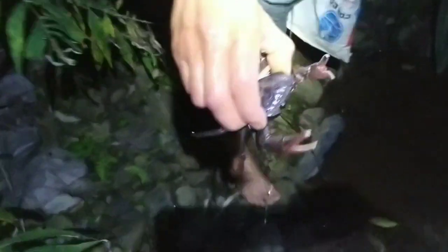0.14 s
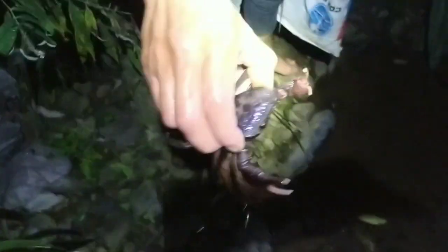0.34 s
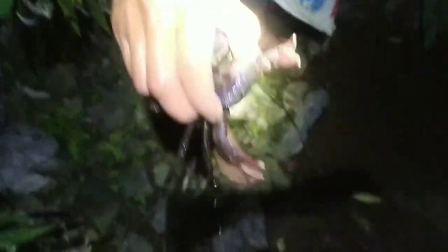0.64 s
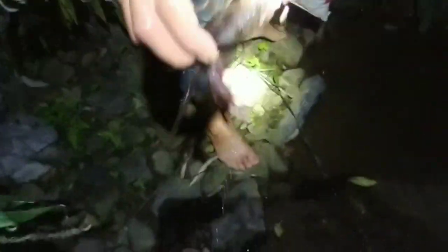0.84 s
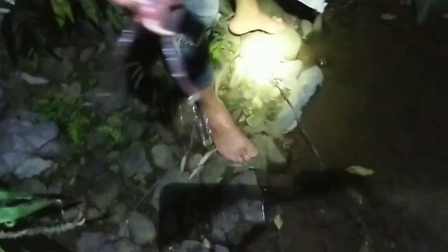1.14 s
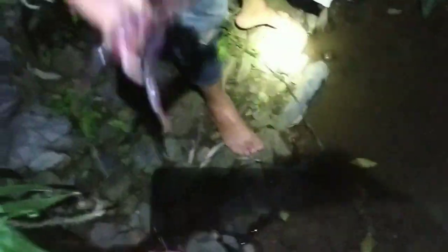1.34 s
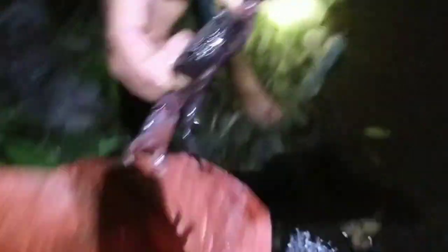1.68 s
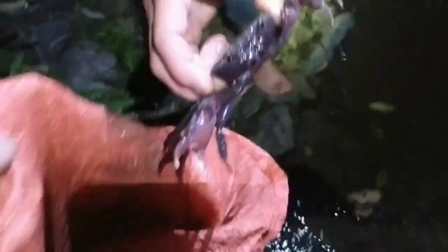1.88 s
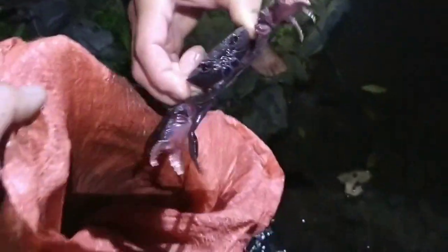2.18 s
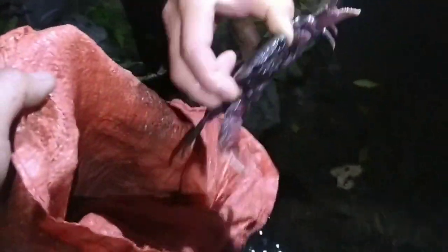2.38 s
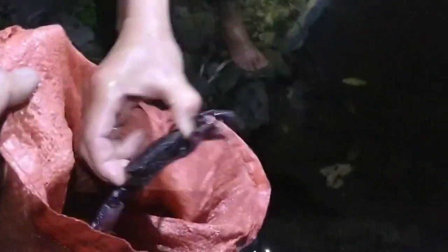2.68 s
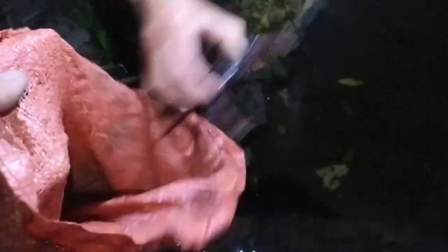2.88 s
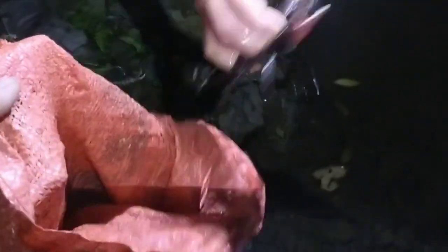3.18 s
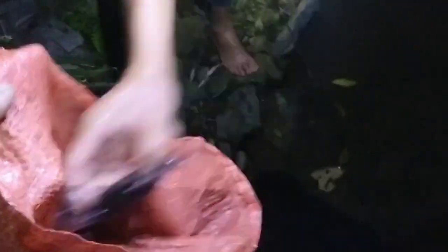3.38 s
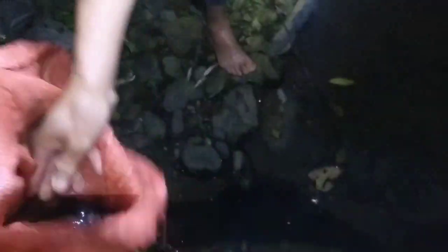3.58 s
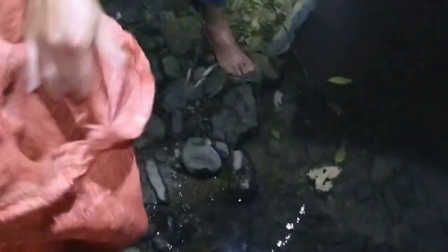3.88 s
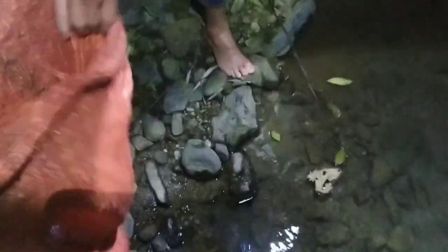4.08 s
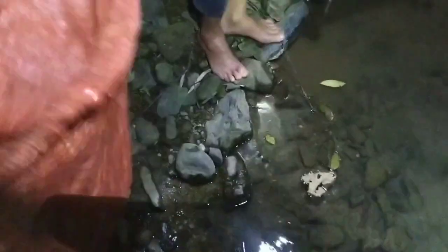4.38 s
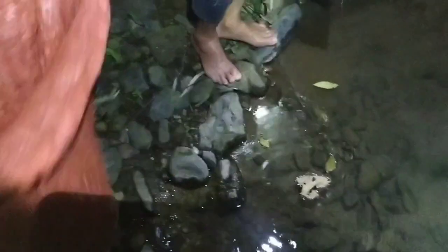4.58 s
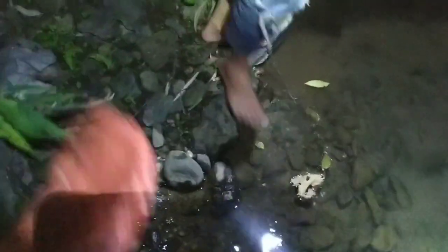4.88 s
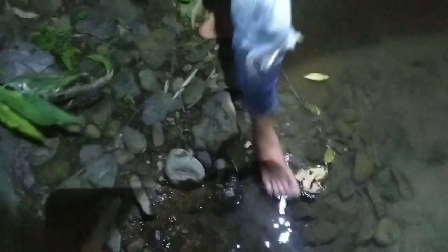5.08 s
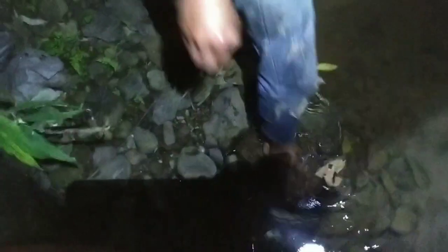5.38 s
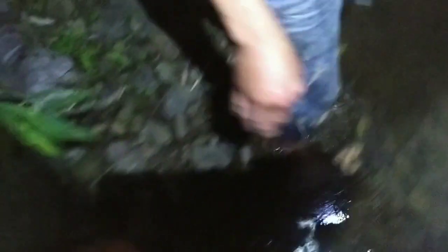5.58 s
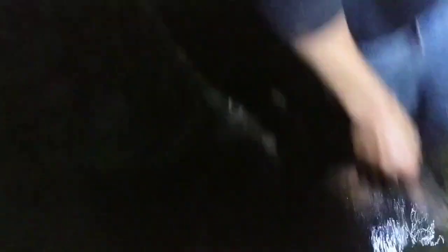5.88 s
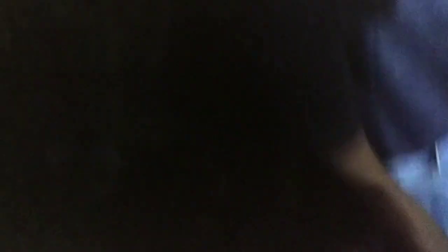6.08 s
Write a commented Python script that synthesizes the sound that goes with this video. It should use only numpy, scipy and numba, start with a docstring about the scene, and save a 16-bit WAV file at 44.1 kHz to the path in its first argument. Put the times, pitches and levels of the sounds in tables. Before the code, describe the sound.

Water trickles over stones with a faint, even hiss and the odd tiny bubble. Scattered ticks from a nearby woven plastic sack build into a short, crisp rustle. Then a single heavy thump, by far the loudest sound, hits the left side of the hand-held microphone. Small splashes and plops follow as a foot and then a hand enter the shallow stream, with a little more rustling.

```python
"""A shallow stream hisses over stones at night, heard from the two microphones of a hand-held phone.
Close by, a woven plastic sack rustles and ticks as its threads slip and snap.
A finger thumps the left microphone port shut and drives that channel's limiter,
then a foot and a hand go into the water with a click and a few plops and bubbles."""
import sys
import numpy as np
from scipy import signal
from scipy.fft import rfft, irfft, next_fast_len
from scipy.io import wavfile
from scipy.ndimage import uniform_filter1d
from numba import njit

SR = 44100
rng = np.random.default_rng(int(sys.argv[2]) if len(sys.argv) > 2 else 0)


def int16_out(signal):
    """Quantize to a 16-bit WAV file."""
    q = np.round(np.clip(np.atleast_2d(signal).T, -1, 1) * 32767)
    wavfile.write(sys.argv[1], SR, q.astype(np.int16))


N = 275245

# The stream's spectrum at the two ports: frequency_hz, left_db, right_db, common_share (0-1)
STREAM_SPECTRUM = [(25, -82.5, -76.5, 0.35), (53, -73.5, -75, 0.57), (96, -84, -81.5, 1),
                   (200, -82.5, -84, 0.85), (264, -83.5, -80, 0.94), (324, -81, -82, 1),
                   (475, -86, -84, 0.46), (1405, -77.5, -80, 0.62), (1960, -74, -82, 0.43),
                   (2680, -79, -81, 0.38), (3230, -85.5, -84.5, 0), (5415, -80.5, -79, 0),
                   (6170, -71.5, -69.5, 0.08), (7090, -76, -76, 0.05), (8630, -75.5, -66.5, 0.01),
                   (9520, -67.5, -76.5, 0), (15330, -91.5, -90.5, 0.1)]
LEFT_LAG_S = 0.00034  # sound from the water reaches the right port first


def undb(db):
    """Gain of a dB value."""
    return 10 ** (np.asarray(db) / 20)


def unit(x):
    """Scale to rms 1."""
    return x / np.sqrt(np.mean(x ** 2))


def walk(rate_hz):
    """Random levels held 1 / rate_hz seconds and smoothed twice; rms 1."""
    hold = int(SR / rate_hz)
    steps = np.repeat(rng.standard_normal(N // hold + 1), hold)
    return unit(uniform_filter1d(uniform_filter1d(steps, hold), hold)[:N])


def lag(x, seconds):
    """One-pole low-pass with the given time constant."""
    keep = np.exp(-1 / (SR * seconds))
    return signal.lfilter([1 - keep], [1, -keep], x)


@njit
def bandpass(x, centre_hz, width_hz):
    """State-variable band-pass, gain 1 at its centre."""
    y, band, low = np.empty(len(x)), 0., 0.
    g, damping = np.tan(np.pi * centre_hz / SR), width_hz / centre_hz
    for i in range(len(x)):
        v = (band + g * (x[i] - low)) / (1 + g * (g + damping))
        band, low, y[i] = 2 * v - band, low + 2 * g * v, damping * v
    return y


def steep_band(x, centre_hz, width_hz):
    """The band-pass twice over."""
    return bandpass(bandpass(x, centre_hz, width_hz), centre_hz, width_hz)


def grains(per_s, spread_db):
    """Random clicks of either sign; spread_db makes a few much louder than the rest."""
    hit = rng.random(N) < per_s / SR
    return unit(hit * rng.standard_normal(N) * undb(spread_db * rng.exponential(1, N)))


def strokes(start, hold, db, rise_db_s, fall_db_s):
    """Gain of strokes that swell, hold and fade at steady rates, summed in power."""
    t = np.arange(0, N, 64)[:, None] / SR
    below_db = rise_db_s * np.maximum(start - t, 0) + fall_db_s * np.maximum(t - start - hold, 0)
    gain = np.sqrt(undb(-2 * below_db) @ undb(2 * np.transpose(db))).T
    return uniform_filter1d(np.repeat(gain, 64, axis=-1), size=64)[..., :N]


def ports(x):
    """Give left and right the colour that the stream has at each microphone port."""
    hz = np.maximum(np.fft.rfftfreq(4096, 1 / SR), 1)
    table, out = np.array(STREAM_SPECTRUM), []
    for ear in range(2):
        db = np.interp(np.log(hz), np.log(table[:, 0]), table[:, 1 + ear]) + 10 * np.log10(SR / 2)
        cepstrum = irfft(np.log(undb(db)))
        cepstrum[1:2048] *= 2  # folding the cepstrum makes the response causal
        cepstrum[2049:] = 0
        out.append(signal.fftconvolve(x[ear], irfft(np.exp(rfft(cepstrum))))[:N])
    return np.array(out)


def stream():
    """Water over stones: countless tiny bursts, in bands that swell together and flicker alone."""
    # Slow drift of the stream's level: time_s, gain_db
    flow = [(0.0, -0.5), (1.8, -0.7), (2.8, -0.9), (3.7, -0.15), (4.7, -0.3), (6.24, 0.5)]
    size = next_fast_len(N)
    hz = np.maximum(np.fft.rfftfreq(size, 1 / SR), 1)
    table = np.array(STREAM_SPECTRUM)
    share = np.clip(np.interp(np.log(hz), np.log(table[:, 0]), table[:, 3]), 0, 1)
    bursts = [unit(rng.standard_normal(N) + 0.13 * grains(1500, spread_db=4.5)) for _ in range(3)]
    common, left, right = rfft(bursts, size)
    late = np.exp(-2j * np.pi * hz * LEFT_LAG_S)
    field = np.sqrt(share) * [common * late, common] + np.sqrt(1 - share) * [left, right]
    out, swell, neighbours = 0, walk(8.2), walk(13)
    for step in range(8, 29):  # half octaves, 16 Hz to 16 kHz
        band = np.cos(np.pi / 2 * np.clip(2 * np.log2(hz) - step, -1, 1)) ** 2
        restless = 1.0 if step < 21 else .6 if step < 25 else .45  # the finer the spray, the steadier
        neighbours = 0.59 * neighbours + 0.5 * walk(11)  # flicker shared with the band below
        flicker_db = restless * (0.23 * swell + 0.18 * neighbours + 2.57 * walk(14))
        out = out + irfft(field * band, size)[:, :N] * undb(flicker_db)
    return ports(out * undb(np.interp(np.arange(N) / SR, *np.transpose(flow))))


def air_pockets(rows):
    """Each bubble rings at its own pitch, gliding as it nears the surface; later and louder at left."""
    out = np.zeros(N + SR)
    for start, db, hz, glide, t60 in rows:
        t = np.arange(int(t60 * SR)) / SR
        phase = 2 * np.pi * np.cumsum(hz * 2 ** (glide * t)) / SR
        envelope = 1000. ** (-t / t60) * np.minimum(t * hz, 1)
        out[int(start * SR):][:len(t)] += undb(db) * np.sin(phase) * envelope
    return np.array([undb(3) * np.roll(out[:N], int(LEFT_LAG_S * SR)), out[:N]])


def swarm(count, low_hz, high_hz, cycles, spread_db):
    """Random bubbles: small ones ring higher, shorter and glide faster; rms 1."""
    when, smallness, loud = rng.random((count, 3)).T
    hz = low_hz * (high_hz / low_hz) ** smallness
    db = -spread_db * np.log(1 - loud)
    glide, t60 = 0.2 * hz / cycles, cycles / hz
    return unit(air_pockets(zip(when * N / SR, db, hz, glide, t60)))


def bubbles():
    """The stream's faint gurgle, and the plops and slosh round foot and hand."""
    # Single bubbles that stand out: start_s, level_db, pitch_hz, glide_octaves_per_s, t60_s
    plops = [(1.05, -41, 754, 7, .04), (1.097, -32, 1720, 12, .025), (1.1, -41, 2300, 8, 0.018),
             (1.238, -44, 2330, 3, 0.023), (1.293, -46, 2030, 6, .025), (1.604, -44, 2360, 6, .025),
             (2.018, -39, 2490, 8, .025), (2.095, -29, 2040, 0, 0.03), (2.792, -40, 1880, 6, .025),
             (3.206, -42, 2800, 6, .025), (3.4575, -40, 1730, 6, .025), (3.5244, -38, 2000, 8, .025),
             (5.160, -41, 647, 4, .04), (5.200, -30, 725, -4, 0.062), (5.201, -26.5, 1260, 6, 0.019),
             (5.1995, -28, 2300, 0.1, .008), (5.290, -48, 370, -2, .12), (5.350, -44, 259, 1, 0.3),
             (5.412, -40.5, 338, 21, 0.098), (5.438, -41.5, 480, -1, 0.082), (5.868, -31, 1950, 4, .035),
             (5.889, -32, 2050, 6, .03), (5.933, -34, 1100, 4, .04), (5.992, -38, 940, 10, .04),
             (6.008, -36, 810, -7, 0.049), (6.031, -36, 723, -11, 0.049), (6.051, -35, 675, -4, 0.068),
             (6.0825, -27.5, 248, -7, 0.063), (6.083, -21, 342, -7, 0.026), (6.100, -36, 460, 2, 0.046),
             (6.185, -43, 454, 3, 0.1)]
    # Water stirred by the foot, then by the hand dipping and groping: start_s, hold_s, level_db
    splashes = [(5.2, .03, -49), (5.888, .03, -57), (5.947, .09, -41.5), (6.22, 0.061, -43)]
    stirring = strokes(*np.transpose(splashes), rise_db_s=160, fall_db_s=63)
    slosh = swarm(count=6000, low_hz=950, high_hz=2600, cycles=15, spread_db=1.5) * stirring
    gurgle = swarm(count=2200, low_hz=350, high_hz=2000, cycles=24, spread_db=1.5) * undb(-59)
    gurgle += swarm(count=2500, low_hz=1500, high_hz=5000, cycles=40, spread_db=1.9) * undb(-52)
    return air_pockets(plops) + slosh + gurgle


def spray():
    """Fine droplets and the thinnest folds of the sack fizz briefly in the high treble."""
    # Puffs of fizz: start_s, hold_s, level_db, left_minus_right_db
    puffs = [(5.172, .012, -39.5, 10), (4.7, .012, -44, 7), (3.8, .03, -45, 9), (3.55, 0.057, -46, 9),
             (3.71, 0.074, -47, 9), (5.468, .008, -43, 5), (5.922, 0.022, -39.5, 12), (1.4, .006, -54, 2)]
    start, hold, db, pan = np.transpose(puffs)
    gain = strokes(start, hold, db + np.array([pan, -pan]) / 2, rise_db_s=800, fall_db_s=350)
    droplets = [grains(9000, spread_db=0) for _ in range(2)]
    return gain * [unit(steep_band(ear, centre_hz=11560, width_hz=4500)) for ear in droplets]


def sack_rustle():
    """Close to the microphones, plastic threads slip over each other in dense bright grains."""
    # Strokes of the weave rubbing: start_s, hold_s, level_db, left_minus_right_db
    rubs = [(3.48, .06, -41, 9), (3.554, 0.036, -31.5, 9), (3.613, 0.027, -40, 11), (3.65, .06, -39.5, 13),
            (3.74, 0.06, -41, 15), (3.84, .02, -46, 10), (3.888, 0.027, -38, 7), (4.288, 0.048, -36.5, 1),
            (4.44, .06, -42, 1), (4.86, .04, -46, 3), (5.075, 0.054, -39, -2), (5.18, .025, -36, 5),
            (5.294, 0.016, -36.5, 7), (5.456, 0.059, -37.5, -2), (5.728, 0.018, -39, 1),
            (5.86, .05, -41, -8), (5.925, 0.027, -33.5, 4), (6.03, 0.13, -44, 7)]
    start, hold, db, pan = np.transpose(rubs)
    gain = strokes(start, hold, db + np.array([pan, -pan]) / 2, rise_db_s=330, fall_db_s=211)
    uneven = undb(1.8 * walk(200))
    slips = [grains(6000, spread_db=1.5) * uneven for _ in range(2)]  # each port hears other folds
    sizzle = ports([steep_band(ear, centre_hz=9980, width_hz=3600) for ear in slips])
    return gain * [unit(ear) for ear in sizzle]


def ticks():
    """Short bright ticks: sack threads snapping, and the click of the foot hitting the water."""
    # The clearest ticks, the foot at 5.2 s: start_s, level_db, left_minus_right_db, pitch_hz, t60_s
    clear = [(0.3067, -20, 2.5, 9530, .012), (0.4214, -22, 4, 8620, .012), (2.2776, -18.5, 4, 9400, 0.014),
             (2.3859, -22, 3, 9890, .012), (3.0913, -20, 5, 9200, .012), (3.4703, -14, 9, 9700, 0.0067),
             (3.495, -20, 8, 9760, .01), (3.5, -23, 8, 10300, .008), (3.549, -11, 2, 10000, .007),
             (3.5664, -19, 8, 10400, .008), (3.5735, -11, 2, 9400, .007), (3.579, -19, 6, 9900, .01),
             (3.5844, -16, 6, 9500, .009), (3.6116, -16.5, 12, 9850, .007), (3.617, -14.5, 12, 9650, .008),
             (3.6203, -19, 12, 9700, .008), (3.6324, -21, 8, 10100, .012), (3.6793, -24, 7, 9700, .01),
             (3.7496, -25, 6, 10200, .01), (3.767, -27, 7, 9800, .008), (3.791, -25, 7, 10000, .008),
             (3.826, -26, 7, 9600, .008), (3.927, -16, 4, 9710, .006), (4.6396, -22, 10, 10200, .007),
             (5.1775, -22, 12, 10060, 0.019), (5.1907, -21, 7, 10500, .004),
             (5.2009, -12.5, 12, 11300, 0.0043), (5.4699, -17, 5, 8390, .01),
             (5.5114, -20, 0.5, 9820, .012), (5.5276, -19.5, 4, 9750, .012), (5.8835, -16, -1, 9700, .012),
             (5.922, -24, 9, 9800, .01), (5.9305, -15, 7, 10200, .008), (5.9365, -19, 7, 9500, .005),
             (5.945, -15, 3, 9400, .006), (5.9845, -23, 3, 9800, .006), (6.109, -21, 5, 8500, .012)]
    faint = [(when * N / SR, -31 + 6 * loud, 5 * side, 8250 + 1650 * pitch, .01)
             for when, loud, side, pitch in rng.random((14, 4))]
    t = np.arange(1200) / SR
    out = np.zeros((2, N + len(t)))
    for start, db, pan, hz, t60 in clear + faint:
        ring = np.sin(2 * np.pi * hz * np.array([[1], [.88]]) * t)  # the right port rings lower
        band = signal.butter(2, [.86 * hz, 1.12 * hz], "band", fs=SR, output="sos")
        rough = signal.sosfilt(band, rng.standard_normal((2, len(t))))
        rise = np.sin(np.pi / 2 * np.minimum(t / (0.076 * t60), 1)) ** 2
        tick = (ring + rough) * rise * 1000. ** (-t / t60)
        at = int(start * SR)
        out[:, at:at + len(t)] += tick * undb([[db + pan / 2], [db - pan / 2]])
    return out[:, :N]


def finger():
    """A finger traps air in the port: it vents fast, the pad recoils into suction, the skin squeaks."""
    # The pad lands, creeps, bounces and lands harder: time_s, pressure_full_scales (before venting)
    press = [(4.64661, 0), (4.64668, .72), (4.6469, 1.05), (4.6474, 1.3), (4.6505, 6.9), (4.6596, 8.2),
             (4.65996, 7.9), (4.65998, 4.9), (4.66015, 4.8), (4.66017, 18.4)]
    vent_s, recoil, recoil_s, rail = .0202, .23, .083, 6.02
    landing, bounce = press[0][0], press[-1][0]
    t = np.arange(N) / SR
    push = lag(np.interp(t, *np.transpose(press)), seconds=.00002)  # soft skin rounds each jolt
    thump = push - (1 + recoil) * lag(push, vent_s) + recoil * lag(push, recoil_s)
    thump -= lag(thump, seconds=.215)  # the amplifier coupling drains the rest
    thump += .003 * (push - lag(push, seconds=.45))  # a last trace of pressure leaks away
    tremble = 1 + (0.039 * walk(70) + 0.067 * walk(180)) * (t > bounce + vent_s)  # unsteady pad
    from_bounce = np.abs(t - bounce)
    slide = (t > landing) * np.exp(-from_bounce / np.where(t < bounce, .0022, .0018))  # skin on the rim
    # the squeak drops out for an instant around the second, harder hit
    slide *= np.clip(from_bounce / .001 - .3, 0, 1)
    noise = rng.standard_normal(N)
    squeak = .75 * slide * unit(steep_band(noise, centre_hz=1900, width_hz=1900))
    hiss_level = np.clip((t - landing) / .004, 0, 1) * (t < bounce + .0015)
    hiss_level *= .07 + .1 * (t > bounce - .002)
    bright_hiss = hiss_level * unit(bandpass(noise, centre_hz=9800, width_hz=3000))
    return np.clip(thump * tremble, -rail, rail) + squeak + bright_hiss


@njit
def limiter(x, threshold, slope, attack_s, release_s):
    """Gain follows the peak envelope: fast down, slow up."""
    attack, release = 1 - np.exp(-1 / (SR * attack_s)), 1 - np.exp(-1 / (SR * release_s))
    y, peak = np.empty(len(x)), 0.
    for i in range(len(x)):
        peak += (abs(x[i]) - peak) * (attack if abs(x[i]) > peak else release)
        y[i] = x[i] * (threshold / max(peak, threshold)) ** (1 - slope)
    return y


def scene():
    """Water and sack at both microphones, the finger on the left one only."""
    out = stream() + sack_rustle() + ticks() + bubbles() + spray()
    out[0] += finger()
    return out


def record(dry):
    """The phone limits each channel on its own, clips at full scale and cuts above 14.3 kHz."""
    held = [limiter(ear, threshold=.7, slope=.088, attack_s=.00012, release_s=.032) for ear in dry]
    top_cut = signal.ellip(12, .2, 85, 14300, fs=SR, output="sos")
    return signal.sosfilt(top_cut, np.clip(held, -1, 1))


dry = scene()
out = record(dry)
int16_out(out)
```